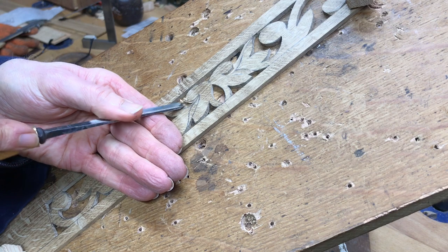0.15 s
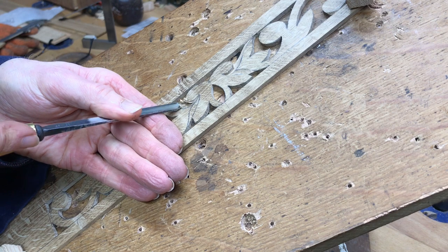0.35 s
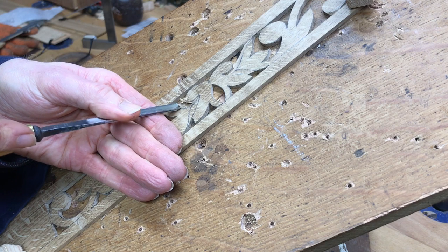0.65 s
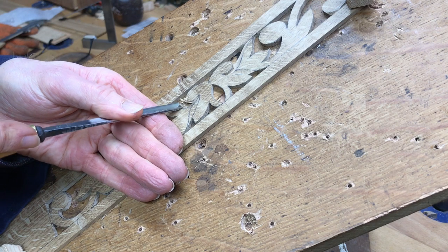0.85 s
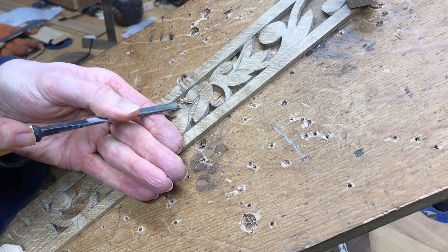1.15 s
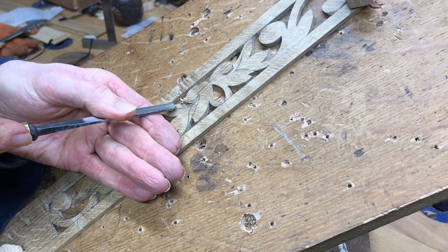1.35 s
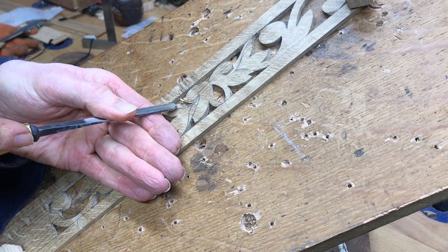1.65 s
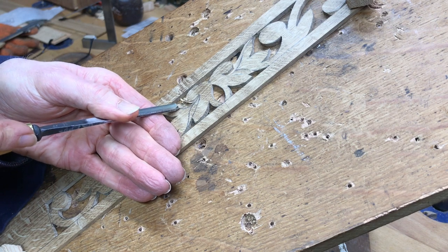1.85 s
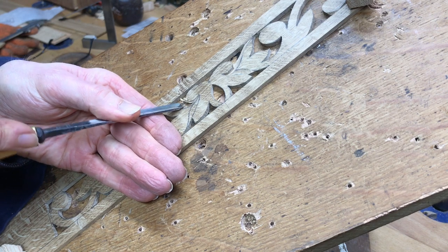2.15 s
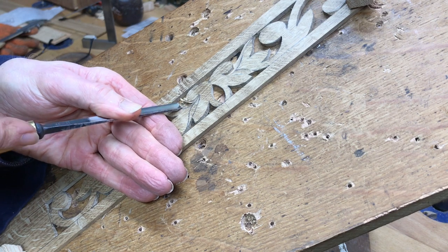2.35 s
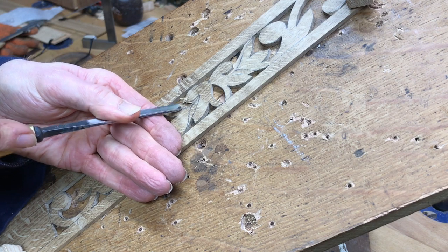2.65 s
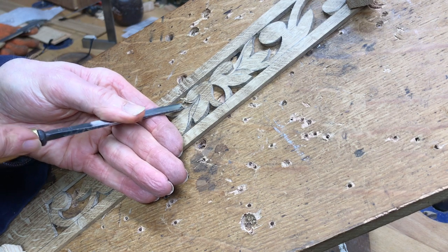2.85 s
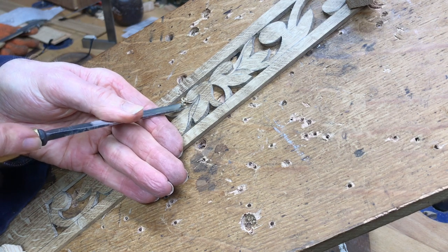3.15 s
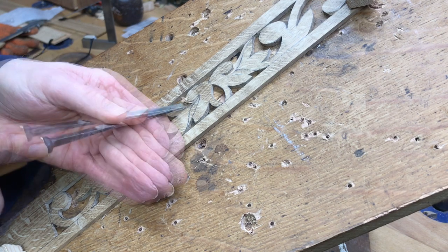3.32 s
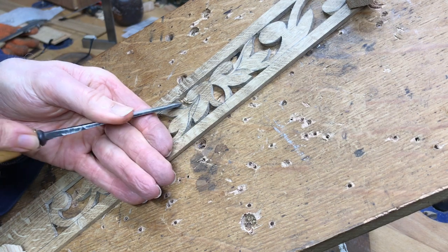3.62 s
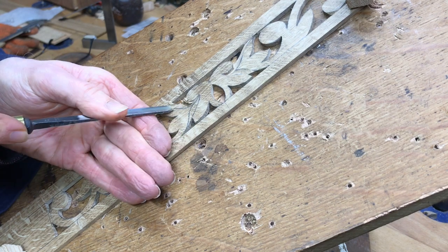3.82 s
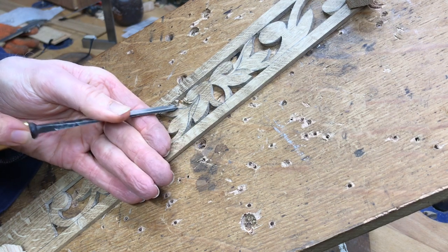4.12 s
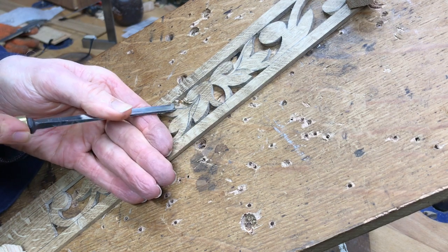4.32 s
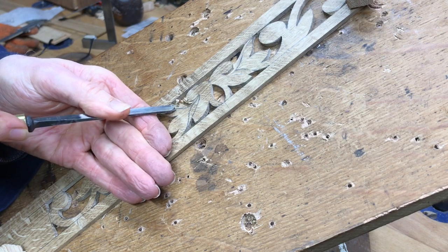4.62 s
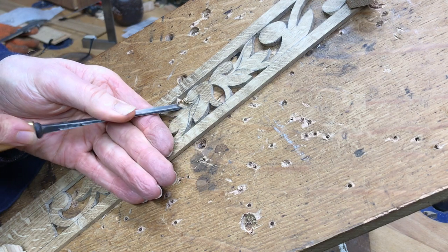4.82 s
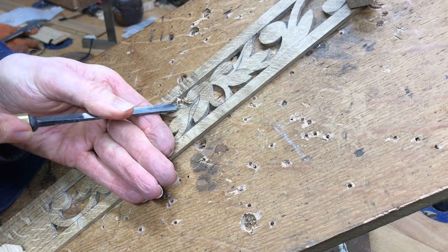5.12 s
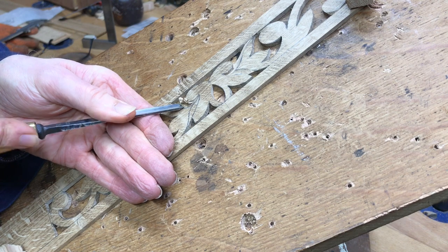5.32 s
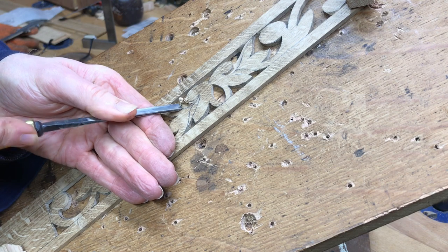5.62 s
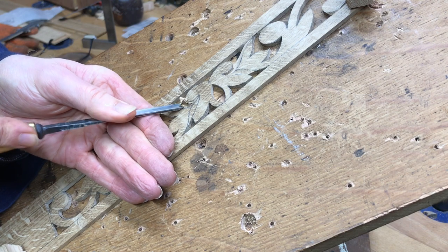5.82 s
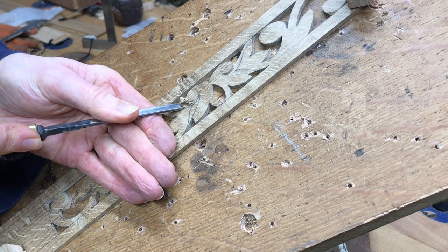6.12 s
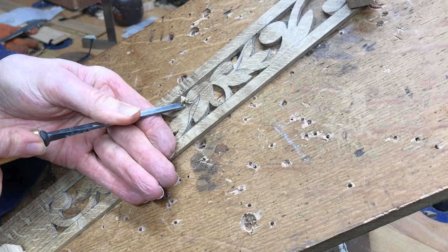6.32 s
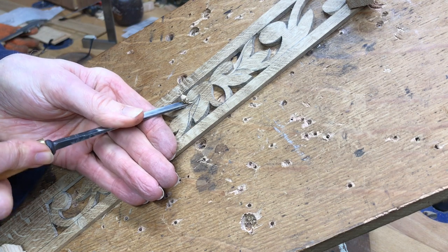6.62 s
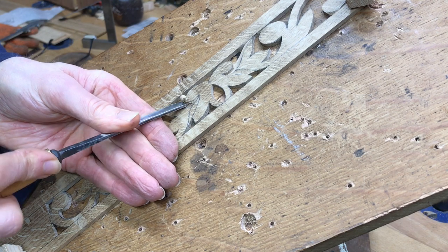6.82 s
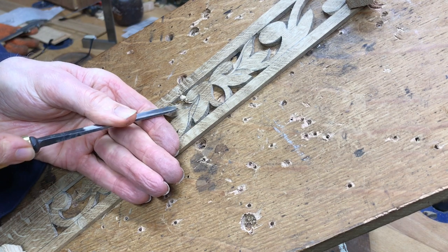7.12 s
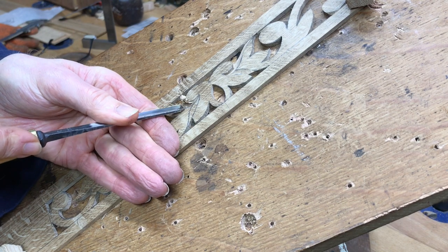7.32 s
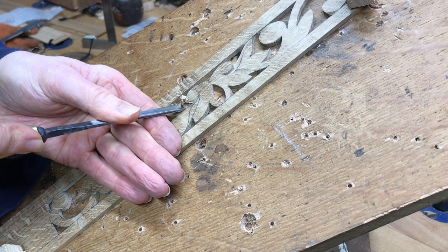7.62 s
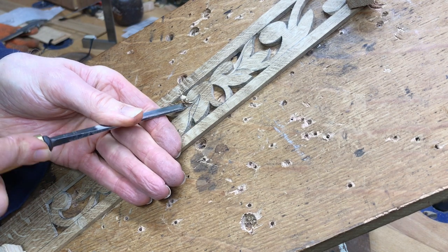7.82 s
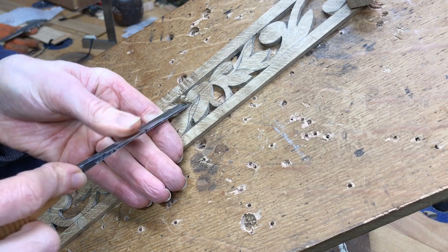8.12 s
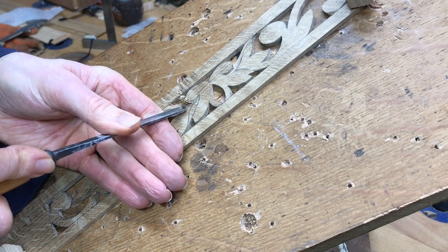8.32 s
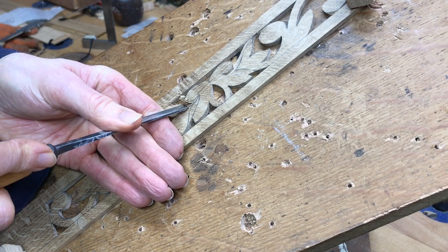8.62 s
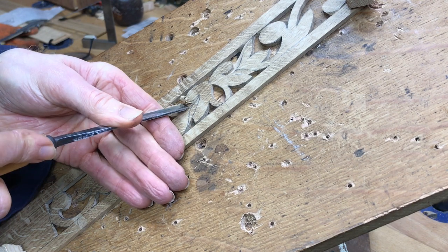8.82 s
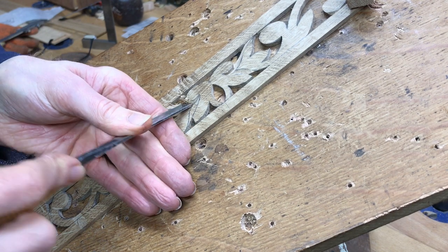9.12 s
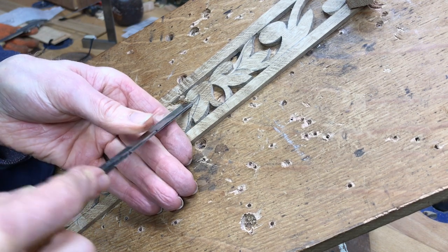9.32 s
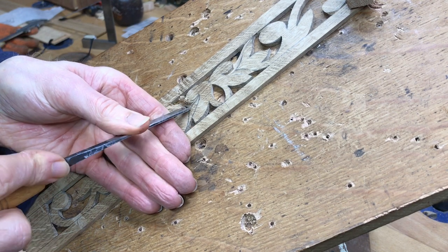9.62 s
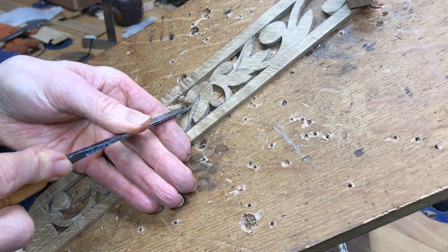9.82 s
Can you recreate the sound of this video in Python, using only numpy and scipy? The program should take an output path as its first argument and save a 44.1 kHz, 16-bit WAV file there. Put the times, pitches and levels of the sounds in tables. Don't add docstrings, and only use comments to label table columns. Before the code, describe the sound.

In a quiet workshop, brief file strokes tear at the edge of a wooden strip, each swelling and cutting off, with irregular gaps. Dull thumps of the jolted bench accompany abrupt stops. Later come a cluster of picking clicks, sparse light drags, another busy burst of clicks near eight seconds, and a few steel ticks. A faint, regular clock and soft low room tone continue underneath; close pickup, very short reverberation.

```python
import sys
import numpy as np
from scipy import signal
from scipy.fft import rfft, irfft
from scipy.io import wavfile

SR = 44100
rng = np.random.default_rng(int(sys.argv[2]) if len(sys.argv) > 2 else 0)


def digitize_waveform(pressure):
    field = np.atleast_2d(pressure).T
    bounded = np.clip(field, -1, 1)
    quanta = np.round(bounded * 32767).astype(np.int16)
    wavfile.write(sys.argv[1], SR, quanta)


def nominal_scale(level):
    x = np.asarray(level, float) / 20
    return 10 ** x


N = 438794

# (f/Hz, level/dB per Hz)
ROOM_SPECTRUM = [(30, -16), (50, -3), (80, 0), (130, 1), (200, -2.5), (300, -9), (420, -18), (750, -22.5),
                 (1000, -26), (2000, -29), (4000, -31), (7000, -32.5), (10000, -37), (16000, -37.5)]
# (first beat t/s, gap between beats t/s, until t/s)
CLOCK_RUNS = [
    (.2915, .3639, 3.4),
    (3.666, .3636, 9.9),
]
# (peak level/dB, lower case share level/dB)
TICK_TOCK = [
    [(-51, -6.5), (-50, -10)],
    [(-58, -.8), (-51.5, -10)],
]
# (f/Hz, level/dB, time to fall 60 dB t/s)
CLOCK_CASE = [(2408, -0.5, 0.063), (2312, -3.5, 0.097), (2540, -32, 0.091), (914, -9.5, 0.032),
              (3740, -13, .05), (4340, -28, 0.057)]
# (f/Hz, level/dB, time to fall 60 dB t/s)
CLOCK_LOWER = [(1764, 4.5, 0.12), (1885, -1.5, 0.04), (2060, -8, .05)]
# (t/s, peak level/dB, f/Hz, time to fall 60 dB t/s)
BENCH_JOLTS = [(.43, -47, 70, .2), (2.89, -37, 55.4, 0.18), (3.24, -43, 50, 0.2),
               (3.559, -37.5, 67.6, 0.31), (4.02, -38.5, 60, 0.28), (4.389, -38, 55.5, 0.15),
               (4.833, -32, 56.5, 0.2), (4.872, -36, 176, 0.13), (5.261, -41.5, 59.5, 0.51),
               (5.291, -44, 168, 0.13), (5.63, -38, 55.3, 0.15), (6.099, -35.5, 53.7, 0.21),
               (6.22, -42, 52.5, 0.37), (6.5, -43, 51.7, 0.5), (7.779, -41, 61.5, 0.26),
               (7.872, -45, 90.7, 0.58), (7.92, -35, 56.6, 0.19), (8.969, -41, 63.4, 0.16),
               (8.972, -40, 260, 0.14), (2.92, -42, 150, 0.16), (3.34, -39.5, 238, 0.19),
               (2.94, -39, 246, 0.14), (3.38, -40, 230, 0.095), (3.59, -45, 727, 0.12),
               (4.85, -49, 745, 0.13), (5.27, -45.5, 740, 0.12), (5.275, -41, 269, .12),
               (6.5, -43, 233, 0.11), (.012, -46, 725, .07), (2.44, -42, 200, .1)]

# (f/Hz, width f/Hz, level/dB before the colour change, level/dB after it)
STRIP = [(1067, 35, -3, -2), (1135, 40, 1, 1), (1300, 35, -11, -12), (1430, 60, -10, -3),
         (1500, 60, -5, -8), (1565, 55, -3, -1), (1710, 65, -1, 0), (1920, 70, -11, -1),
         (2120, 120, -10, -8), (2250, 70, -9, -5), (2330, 55, -7, -5), (2560, 85, 1, 1),
         (2760, 60, -12, -9), (2890, 75, -8, -5), (3050, 80, -15, -8), (3240, 110, -14, -6),
         (3370, 60, -14, -7), (3510, 50, -10, -8), (3670, 60, -11, -7), (3830, 90, -6, -2),
         (3990, 100, -12, -9), (4200, 150, -16, -11)]
BOARD = [(241, 35, 0, 1), (310, 50, -11, -11), (425, 45, -14, -12), (550, 35, -4, -8), (630, 45, -12, -9),
         (730, 35, -8, -8)]
EDGE = [(4534, 136, 1, 2.5), (4770, 186, 0.5, 1.5), (5390, 290, 1.5, -0.5), (5810, 200, -9, -1),
        (6340, 250, -1.5, 0), (7210, 490, -8, -2.5), (7650, 60, -4, -4.5), (8420, 500, -8.5, -10)]
TEETH = [(9630, 400, -8, -8), (10700, 1700, -8.5, -7), (12500, 600, -6, -2.5), (14050, 760, -2, -9),
         (15100, 600, -5, -2)]
SHANK = [(7700, 170, -1, 3), (9500, 350, -6, -7), (15100, 2600, -1, -2)]

# (t/s, peak level/dB, hollow knock re peak level/dB, low push re peak level/dB)
STOPS = [(2.496, -32, -29, -4.5), (2.6567, -46.5, -4, -8), (3.3672, -35, -8, -6), (3.5688, -31.5, -18, -7),
         (3.8338, -39, -6, -6), (4.8284, -25, -9, -8), (4.959, -44.5, -8, -6), (5.252, -26.5, -6, 0),
         (6.047, -36, -22, -18), (6.083, -34, -5, -9)]
# (t/s, peak level/dB, hollow knock re peak level/dB, low push re peak level/dB)
PICKS = [(6.1504, -43, -4, -12), (6.16, -36.5, -15, -7), (6.212, -33, -6, -1), (6.272, -41, -10, -11),
         (6.309, -40, -10, -3), (6.3377, -41, -3, -5), (6.4906, -27.5, -13, -9), (6.5917, -33, -8.5, -5),
         (6.8743, -43, -24, -2), (7.5576, -44.5, -7, -6), (7.7683, -31.5, -6, 2.5), (7.852, -31.5, -9, 2.5),
         (7.891, -29.5, -3.5, 1.5), (7.9185, -24.5, -8.5, -4)]
# (t/s, knock level/dB, crack re knock level/dB, low push re knock level/dB)
KNOCKS = [(6.5257, -42, -6.5, -12.5), (6.5804, -45, -6.5, -13.5), (7.2548, -42, -16.5, -4),
          (7.7937, -41, 0, 2), (7.8764, -35, -6, -5), (7.896, -42, -5, -17), (8.2256, -49.5, 1, 5),
          (8.9287, -43, -6, -18), (9.795, -46.5, -11, 1)]
# (t/s, tick level/dB, crack re tick level/dB)
TICKS = [
    (3.235, -48, 8),
    (6.1414, -43, -3),
    (8.033, -56, -5),
    (8.0612, -45, 6),
    (9.2251, -34.5, -1),
]

# (touch t/s, hardest t/s, lift t/s, tearing at touch level/dB, tearing at hardest level/dB)
FLAT = [(-.05, 0.001, .02, -36, -32), (.385, .447, .472, -48, -32.5), (.78, .9, .935, -54, -36.5),
        (1.905, 1.955, 2.008, -59, -33), (2.36, 2.455, 2.497, -50, -34), (2.795, 2.885, 2.945, -57, -35),
        (3.285, 3.337, 3.35, -51, -37), (5.961, 6.069, 6.088, -53, -40)]
SECOND_NOTCH = [(3.477, 3.568, 3.572, -51, -37), (3.89, 4.0, 4.028, -55, -39.5), (4.25, 4.4, 4.436, -55, -42),
                (4.71, 4.81, 4.845, -53, -42), (5.075, 5.21, 5.25, -50, -42.5), (5.53, 5.625, 5.668, -56, -40)]
DRAGS = [(2.295, 2.31, 2.34, -58, -56), (3.2, 3.23, 3.265, -52, -50), (.26, .35, .37, -62, -54),
         (3.383, 3.42, 3.455, -53, -50), (3.637, 3.65, 3.79, -64, -61), (4.083, 4.14, 4.15, -69, -60.5),
         (6.14, 6.15, 6.3, -62, -59), (6.437, 6.498, 6.53, -66, -53), (6.557, 6.597, 6.61, -66, -55),
         (6.72, 6.95, 7.1, -66, -61), (7.25, 7.256, 7.27, -63, -58), (7.557, 7.568, 7.74, -55, -55),
         (7.77, 7.79, 7.82, -56, -52), (7.85, 7.924, 7.935, -50, -44.5), (7.97, 8.05, 8.06, -58, -53),
         (8.11, 8.168, 8.2, -70, -61), (8.753, 8.755, 8.8, -63, -64), (8.84, 8.95, 8.985, -51, -47.5),
         (9.03, 9.06, 9.15, -53, -51), (9.181, 9.215, 9.225, -57, -47)]
# (t/s, tearing level/dB)
BITES = [(2.732, -50), (3.19, -47), (3.847, -44.5), (4.675, -49), (5.486, -51)]
GRIP_COLOUR = {"flat": [(-13, -4.5, -19), (-13, -2, -20), (-10, -5, -20), (-6, 7, -14)],
               "edgewise": [(-9, -1, -18), (-7.5, -2, -15.5), (-8, -3, -18), (-5, 10, -14)],
               "drag": [(-10, 1, -18), (-10, 0, -19), (-10, 1.1, -18), (-6, 8, -14)], "bite": [(-5, 0, -10),
               (-9.5, -12, -20), (-12, -8, -22), (-6, 3, -19)]}
GRIP_MOTION = {"flat": (120, .045, 35, .85), "edgewise": (90, .035, 32, 1.3),
               "drag": (35, 0.044, 21.5, 1.33), "bite": (330, 0.028, 12, 1)}

COLOUR_CHANGE_S = 3.44
LANDING_S, LANDING_DB = 0.016, 12
BITE_RISE_S, BITE_RISE_DB, BITE_HOLD_S = .012, 10, .025


def rms_one(x):
    return x / np.sqrt(np.mean(x ** 2) + 1e-20)


def band(x, low_hz, high_hz):
    return signal.sosfilt(signal.butter(2, [low_hz, high_hz], "band", fs=SR, output="sos"), x)


def drift(rate_hz):
    r = np.exp(-2 * np.pi * 20 * rate_hz / SR)
    noise = rng.standard_normal(N // 20 + 2002)
    slow = rms_one(signal.lfilter([1], [1, -2 * r, r * r], noise)[2000:])
    return np.interp(np.arange(N) / 20, np.arange(len(slow)), slow)


def resonate(x, hz, width_hz, count=1):
    r = np.exp(-np.pi * width_hz / SR)
    ring = [(1 - r * r) / 2, 0, (r * r - 1) / 2, 1, -2 * r * np.cos(2 * np.pi * hz / SR), r * r]
    return signal.sosfilt([ring] * count, x)


def body(force, modes, patchy_db):
    out = 0
    moved = np.arange(N) > COLOUR_CHANGE_S * SR
    hush = 1e-12 * np.sin(np.arange(N))
    for k, (hz, width_hz, first_db, second_db) in enumerate(modes):
        feed = (force + hush) * np.where(moved, nominal_scale(second_db), nominal_scale(first_db))
        if patchy_db:
            feed = feed * nominal_scale(patchy_db * drift(9.5))
        out = out + (-1) ** k * resonate(feed, hz, 1.55 * width_hz, count=2)
    return out


def bursts(times, levels_db, t60):
    kicks = np.zeros(N)
    kicks[np.round(np.asarray(times) * SR).astype(int)] = nominal_scale(levels_db)
    dying = signal.lfilter([1], [1, -nominal_scale(-60 / (t60 * SR))], kicks + 1e-18)
    return dying * rng.choice([-1, 1], N)


def room_tone():
    hz, level_db = np.transpose(ROOM_SPECTRUM)
    grid_hz = np.arange(N // 2 + 1) * SR / N + 1
    shape = nominal_scale(np.interp(np.log(grid_hz), np.log(hz), level_db))
    tone = irfft(rfft(rng.standard_normal(N)) * shape, N)
    return nominal_scale(-47.5 + .5 * drift(6.3)) * rms_one(tone)


def beats():
    out = []
    for (first, gap, until), pair in zip(CLOCK_RUNS, TICK_TOCK):
        for k, s in enumerate(np.arange(first, until, gap)):
            out.append((s, *pair[k % 2]))
    return out


def clock():
    s, peak_db, lower_db = np.transpose(beats())
    upper = bursts(s, peak_db + 24.5, t60=0.1)
    lower = bursts(s + 0.012, peak_db + lower_db + 23.5, t60=0.1)
    out = 0
    for rattle, modes in [(upper, CLOCK_CASE), (lower, CLOCK_LOWER)]:
        for hz, db, t60 in modes:
            out = out + nominal_scale(db) * resonate(rattle, hz, np.log(1000) / np.pi / t60)
    return out


def bench():
    out, time = np.zeros(N + SR), np.arange(SR) / SR
    phases = rng.uniform(0, 2 * np.pi, len(BENCH_JOLTS))
    for (s, peak_db, hz, t60), phase in zip(BENCH_JOLTS, phases):
        swell = 1 - np.exp(-(time * hz / 1.22) ** 2)
        swing = swell * nominal_scale(peak_db + 9.5 - 60 * time / t60) * np.sin(2 * np.pi * hz * time + phase)
        out[round((s - .01) * SR):][:SR] += swing
    return out[:N]


def workshop(x, t60, level_db):
    time = np.arange(SR // 2) / SR
    tail = band(rng.standard_normal(len(time)), 140, 7700) * nominal_scale(-60 * time / t60)
    tail = tail * (time > .006)
    return nominal_scale(level_db) * signal.fftconvolve(x, tail / np.linalg.norm(tail))[:N]


def contacts():
    return ([(s, db, knock, -15.5, low) for s, db, knock, low in STOPS]
            + [(s, db, knock, -11.5, low) for s, db, knock, low in PICKS]
            + [(s, db + crack, -crack, -8, low - crack) for s, db, crack, low in KNOCKS]
            + [(s, db + crack, -8, -crack, -9) for s, db, crack in TICKS])


def catches():
    s, peak_db, knock_db, bright_db, low_db = np.transpose(contacts())
    crack = bursts(s, peak_db, t60=0.036)
    knock = np.abs(bursts(s, peak_db + knock_db, t60=.0012))
    bright = bursts(s, peak_db + bright_db, t60=.013)
    push = np.abs(bursts(s, peak_db + low_db, t60=0.0032))
    rung = nominal_scale(4.5) * body(crack, STRIP[7:], 0) + nominal_scale(-0.5) * band(crack, 1700, 4500)
    hollow = nominal_scale(24.0) * body(knock, STRIP[:7], 0) + nominal_scale(10) * band(knock, 700, 2500)
    sharp = nominal_scale(5) * body(bright, EDGE + SHANK, 0) + nominal_scale(4.5) * band(bright, 2900, 14000)
    return rung + hollow + sharp + nominal_scale(19.5) * body(push, BOARD, 0)


def pressure(row, grip):
    touch, hardest, lift, touch_db, peak_db = row
    sag, lift_s, drop_db, bend = GRIP_MOTION[grip]
    lift = max(lift, hardest + .002)
    start, end = touch - LANDING_S, lift + lift_s
    at = np.arange(max(round(start * SR), 0), round(end * SR))
    time = at / SR
    built = np.clip((time - touch) / (hardest - touch), 0, 1) ** bend
    landing_db = np.interp(time, [start, touch], [-LANDING_DB, 0])
    sag_db = -sag * (lift - hardest)
    leaving_db = np.interp(time, [hardest, lift, end], [0, sag_db, sag_db - drop_db])
    tear_db = touch_db + built * (peak_db - touch_db) + landing_db + leaving_db
    phases = [touch, hardest, lift, end]
    colour_db = [np.interp(time, phases, c) for c in np.transpose(GRIP_COLOUR[grip])]
    fade = np.clip(np.minimum(time - start, end - time) / .006, 0, 1)
    return at, fade * nominal_scale(tear_db + np.array([0 * time] + colour_db))


def efforts():
    levels = np.full((4, N), 1e-9)
    bites = [(s - BITE_RISE_S, s, s + BITE_HOLD_S, db - BITE_RISE_DB, db) for s, db in BITES]
    for grip, rows in [("flat", FLAT), ("edgewise", SECOND_NOTCH), ("drag", DRAGS), ("bite", bites)]:
        for row in rows:
            at, gains = pressure(row, grip)
            levels[:, at] += gains
    return levels


def fibres(per_s, spread_db, clump_db):
    sizes = nominal_scale(spread_db * np.minimum(rng.exponential(1, N), 5)) * rng.choice([-1, 1], N)
    torn = rng.random(N) < per_s / SR
    return rms_one(sizes * torn * nominal_scale(clump_db * drift(90)))


def strokes():
    levels = efforts()
    tear, edge, drum, sizzle = levels * fibres(per_s=6000.0, spread_db=3.3, clump_db=2.1)
    rasp = levels * fibres(per_s=8200.0, spread_db=5.5, clump_db=3.5)
    strip = nominal_scale(12.0) * body(tear, STRIP, patchy_db=1.6) + nominal_scale(-6) * band(rasp[0], 600, 2900)
    steel = nominal_scale(7) * body(edge, EDGE, patchy_db=3.5) + band(rasp[1], 3000, 9100)
    teeth = nominal_scale(9.5) * body(sizzle, TEETH, patchy_db=2.5) + nominal_scale(-2.5) * band(rasp[3], 9900, .45 * SR)
    board = nominal_scale(21.5) * body(drum, BOARD, patchy_db=1)
    return strip + steel + teeth + board


def scene():
    work = strokes() + catches()
    echo = workshop(work, t60=0.11, level_db=-16.0)
    return (work + echo + bench() + clock() + room_tone())[None]


def roll_off(x):
    return signal.sosfilt(signal.butter(12, 16490, fs=SR, output="sos"), x)


def record(dry):
    x = signal.sosfilt(signal.butter(4, 42, "high", fs=SR, output="sos"), dry)
    x = signal.sosfilt(signal.ellip(10, .5, 40, 15720, fs=SR, output="sos"), x)
    return roll_off(x)


dry = scene()
out = record(dry)
digitize_waveform(out)
```